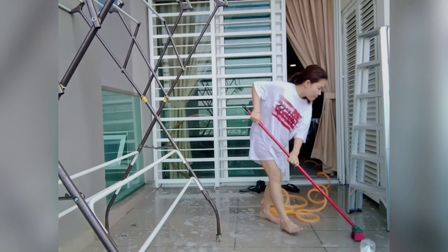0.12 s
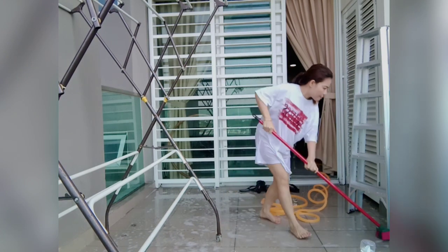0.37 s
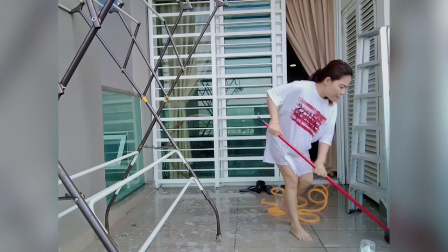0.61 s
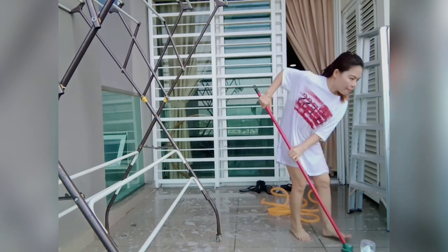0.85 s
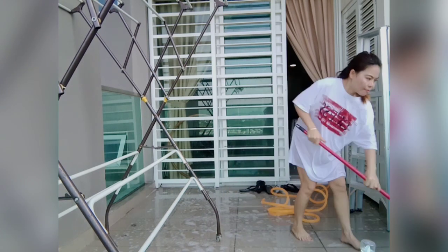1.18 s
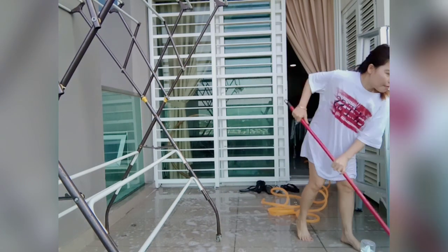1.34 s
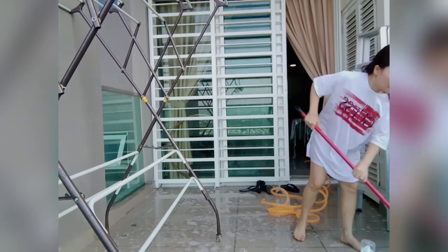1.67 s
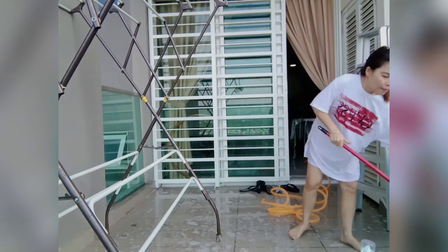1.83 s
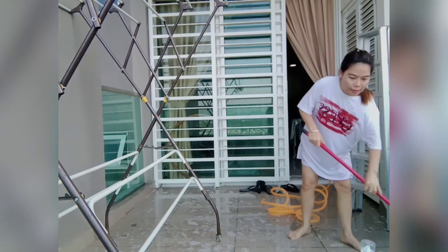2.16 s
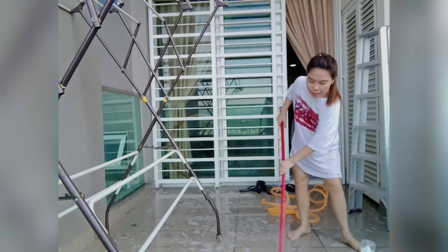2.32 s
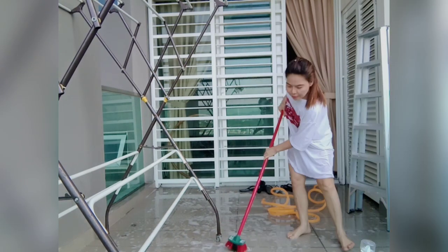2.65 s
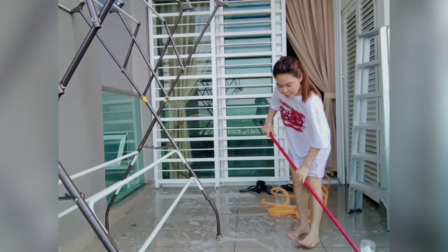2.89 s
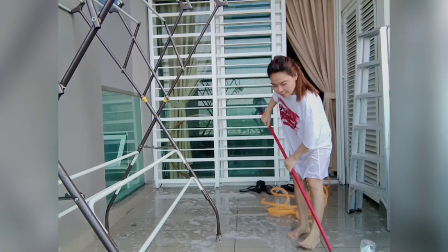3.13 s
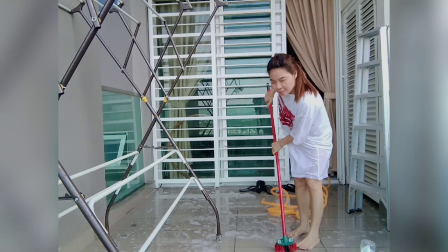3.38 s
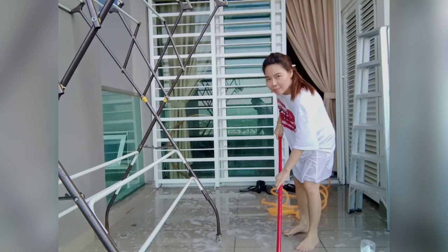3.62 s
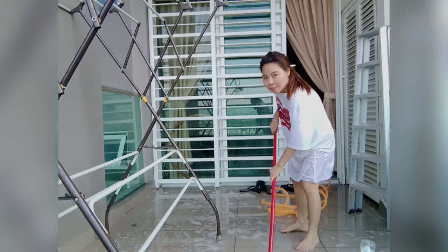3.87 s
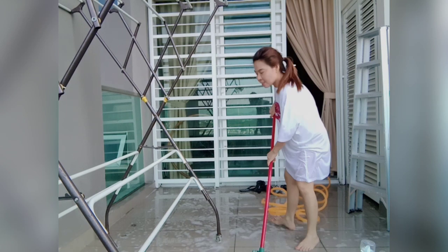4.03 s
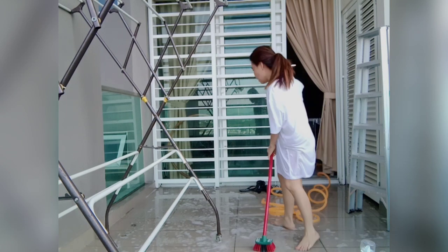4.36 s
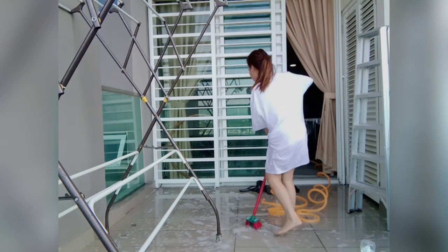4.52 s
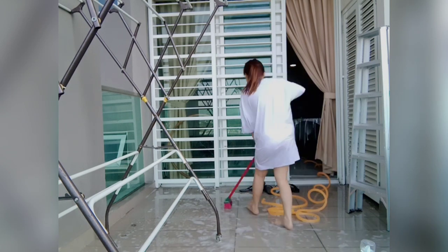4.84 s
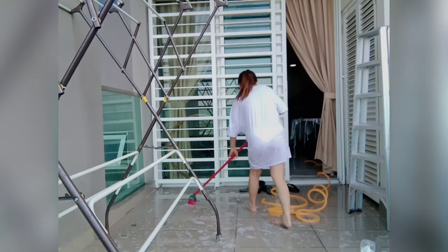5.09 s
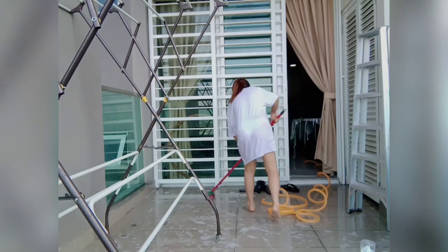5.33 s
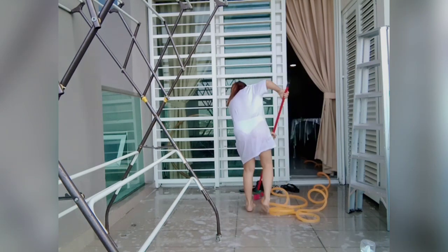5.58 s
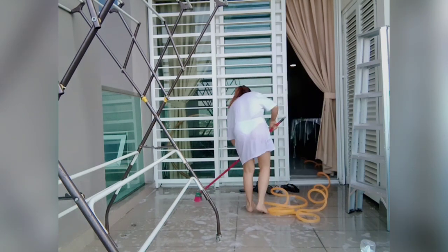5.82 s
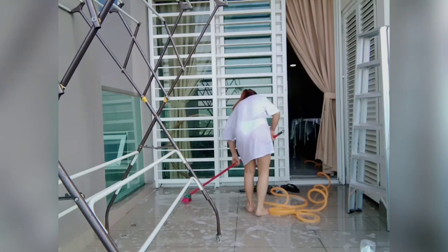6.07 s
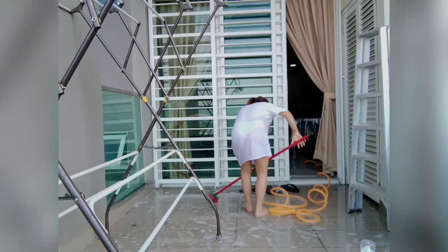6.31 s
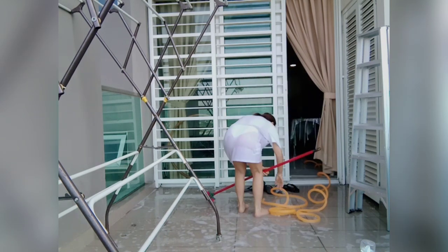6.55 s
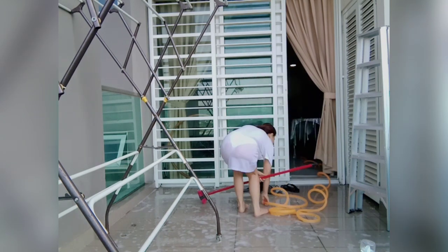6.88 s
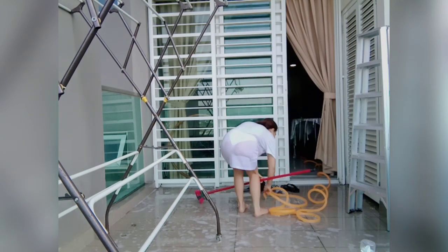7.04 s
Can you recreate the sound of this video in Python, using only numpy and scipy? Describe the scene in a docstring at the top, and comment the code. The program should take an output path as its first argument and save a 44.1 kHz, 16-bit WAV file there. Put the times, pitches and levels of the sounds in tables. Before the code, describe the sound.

Close, grainy scrubbing on wet tile: coarse bristles start each push or pull thin and bright, deepen as they bend, and throw fine spray. Quick strokes overlap for about six seconds, then weaken and stop, followed by two tiny bristle touches. Nearby hard walls add a short reflection. Underneath lie dull outdoor rumble, muffled thumps, distant noise, a far faint whine and steady high hiss; mono, fairly near microphone.

```python
"""From the start a stiff long-handled brush scrubs to and fro over wet balcony tiles; close walls answer.
Random bristle flicks make the rasp, thin as a stroke starts and deeper as they bend; finer flicks make spray.
One tiny dull pop falls at 3.7 s; after 6.5 s the brush comes to rest with two light ticks of rustle and spray.
Throughout: shaped noise as low outdoor rumble, soft thumps, dull distant noise and a steady hiss; narrow
noise bands as a far whine and faint short tones. Mono, 7.2 s."""
import sys
import numpy as np
from scipy import signal
from scipy.fft import rfft, irfft, next_fast_len
from scipy.io import wavfile
from scipy.ndimage import uniform_filter1d, map_coordinates

SR = 44100
rng = np.random.default_rng(int(sys.argv[2]) if len(sys.argv) > 2 else 0)


def wav_record(signal):
    """Record a signal, one row per channel, as 16-bit PCM in the file named by sys.argv[1]."""
    frames = np.transpose(np.atleast_2d(signal))
    bounded = np.clip(frames, -1, 1)
    # unit amplitude maps onto the largest positive 16-bit level
    quanta = np.round(bounded * 32767).astype(np.int16)
    wavfile.write(sys.argv[1], SR, quanta)


N = 317520
TIME_S = np.arange(N) / SR

# Levels are relative: later gains and normalisation apply. Spectra are per Hz of bandwidth.
# Strokes, pushes and pulls: start/s, length/s, level/dB, speed-up/s, slow-down/s, bend f at start/Hz,
# bend f fully bent/Hz, share of stroke until fully bent/1, extra body round 1.9 kHz/dB, spray re rasp/dB
STROKE_ROWS = [(-.2, .27, -22.5, .1, .1, 1500, 1060, 0.55, -2, -23),
               (0.028, .46, -22.5, 0.1, .11, 2400, 1370, 0.49, 3.5, -21),
               (0.364, 0.31, -23.5, .1, 0.14, 2530, 1050, 0.88, 3, -21),
               (0.657, 0.41, -21, 0.16, .21, 1740, 1090, 0.47, -0.5, -20),
               (0.965, 0.42, -20.5, .1, .17, 3120, 1170, 0.9, 0.5, -21),
               (1.365, .36, -21, 0.077, 0.18, 2700, 2130, .9, -1, -19.5),
               (1.691, 0.44, -21, 0.087, 0.28, 4400, 2700, 0.91, 3.5, -19),
               (2.113, .37, -21.5, 0.21, .17, 3450, 2700, 0.95, 0.5, -16.5),
               (2.328, 0.52, -20.5, 0.13, 0.28, 2300, 1100, 0.59, -0.5, -21.5),
               (2.729, 0.44, -21, 0.13, 0.17, 1950, 1380, 0.58, -1, -22),
               (3.166, 0.35, -21, .08, 0.17, 2620, 1700, 0.78, 0, -24),
               (3.441, 0.43, -20, 0.17, 0.23, 2200, 1680, 0.51, -1, -22),
               (3.858, 0.42, -20.7, 0.14, 0.3, 3940, 1400, 0.8, 1.5, -23),
               (4.287, .51, -22, 0.28, 0.2, 2630, 1320, 0.74, -0.5, -24),
               (4.6, .77, -22.5, 0.3, .18, 1200, 985, 0.41, 2.5, -20.7),
               (5.389, .41, -20.5, 0.15, .19, 2100, 1060, 0.43, 0, -23),
               (5.767, 0.42, -19.5, .12, 0.27, 2420, 1340, 0.38, -0.5, -25),
               (6.192, 0.33, -29.5, 0.15, 0.24, 3650, 2300, 1, 1.5, -19)]
# Bristles creeping on the tiles between strokes, until set down: t/s, level/dB
CREEP_LEVEL = [(0, -41), (1.7, -39), (2.1, -38), (3.9, -37), (4.3, -34.5), (5.35, -36), (6.15, -38.5),
               (6.5, -41), (6.68, -59.5)]
# Rasp spectrum, bristles fully bent: f/Hz, level/dB
RASP_SPECTRUM = [(500, -21), (780, -15), (1000, -12), (1250, -4.5), (1700, -9.5), (2800, -4.5),
                 (3400, -6.5), (4500, -2), (5200, -3), (6200, 0.5), (6600, -4.5), (7300, 4), (8300, -5.5),
                 (9600, -17.5)]
# Spray spectrum: f/Hz, level/dB
SPRAY_SPECTRUM = [(6000, -11), (8500, 4.5), (9600, 1), (11000, -4.5), (12000, -9.5), (13000, -36)]
# Light contacts of the brush head: t/s, level/dB
TICK_ROWS = [(6.553, -35), (6.789, -40)]
# Decay of the wall answer: f/Hz, t60/s
WALL_DECAY = [(200, .35), (2000, 0.41), (7000, 0.042), (12000, 0.43)]
# Outdoor rumble: t/s, level/dB
RUMBLE_LEVEL = [(0, -42), (.25, -44), (.45, -49.5), (.95, -47.5), (1.15, -57.5), (2.4, -56.5), (3.1, -51),
                (3.75, -59), (3.9, -42.5), (4.4, -47.5), (4.55, -58), (4.8, -48), (5.9, -54), (6.15, -44.5),
                (6.6, -44), (6.9, -48), (7.2, -44)]
# Rumble spectrum: f/Hz, level/dB
RUMBLE_SPECTRUM = [(25, -28), (50, -18), (75, -12), (94, -1), (112, -1.5), (140, -8), (170, -12),
                   (210, -13), (320, -27.5), (600, -52)]
# Soft low thumps in the rumble: t/s, level/dB
THUMP_ROWS = [(.05, -37.5), (.36, -44.5), (.6, -41), (1.0, -37), (1.28, -47), (1.68, -50), (2.03, -43.5),
              (2.74, -46), (3.49, -45.5), (4.71, -45), (4.89, -39), (5.15, -48), (5.34, -52), (5.47, -44.5),
              (5.63, -42.5), (5.79, -39)]
# Dull distant noise: t/s, level/dB
DISTANT_LEVEL = [(0, -55.5), (1.1, -58), (2.4, -60), (2.75, -59), (4.5, -59), (5.95, -59), (6.1, -52),
                 (6.4, -53.5), (6.7, -60), (7.2, -56.5)]
# Distant noise spectrum: f/Hz, level/dB
DISTANT_SPECTRUM = [(150, -4.5), (300, -2), (500, -5), (700, -6.5), (1000, -4), (1800, -5.5), (3000, -33),
                    (6000, -48)]
# Far whine: t/s, level/dB, f/Hz
WHINE_TRACK = [(0, -52.5, 1225), (2.3, -52.5, 1245), (4.2, -47, 1260), (5.9, -47.5, 1240),
               (6.11, -38.5, 1252), (6.25, -53.5, 1234), (6.58, -55, 1238), (6.66, -50.5, 1235),
               (6.8, -47.5, 1207), (6.96, -43.5, 1290), (7.12, -44.5, 1278), (7.2, -49, 1275)]
# Faint passing tones, low hums to thin squeaks: t/s, length/s, f start/Hz, f end/Hz, width/Hz, level/dB
TONE_ROWS = [(-.08, 0.17, 339, 346, 23, -46.5), (4.851, 0.66, 86, 81.9, 5, -50.5),
             (5.945, 0.43, 96.8, 95.5, 5.6, -38.5), (6.017, 0.29, 411, 401, 22, -49.5),
             (6.03, 0.11, 690, 654, 25, -50.5), (6.026, .1, 740, 760, 28, -58),
             (6.42, 0.11, 3100, 2490, 260, -52), (6.436, 0.24, 98, 93.4, 1.8, -40),
             (6.72, .13, 3000, 3690, 530, -56), (6.89, .1, 670, 737, 68, -51)]
# Quiet steady hiss spectrum, with peaks near 6 and 7.4 kHz: f/Hz, level/dB
HISS_SPECTRUM = [(2200, -11.5), (3400, -17), (3900, -16), (5200, -24), (6000, -2), (6350, -7), (6650, -18),
                 (7000, 0), (7450, 4), (8000, -5), (9000, -9.5), (10000, -18), (12500, -32)]

RECOVER_OCTAVES_PER_S = 1.9  # bristles straighten as the brush slows
SPLASH_DB, SPLASH_S = 13, 0.24  # spray boost as a stroke meets fresh water; its 1/e time in dB
THUMP_S = 0.036  # from thump peak to 1/e
TOP_HZ = 13250


def amp(db):
    """Decibels to gain."""
    return 10 ** (np.asarray(db) / 20)


def unit(x):
    """Scale to rms 1."""
    return x / np.sqrt(np.mean(x ** 2) + 1e-20)


def along(points, hz):
    """Interpolate (f/Hz, value) points on a log frequency axis."""
    f_hz, value = np.transpose(points)
    return np.interp(np.log(hz + 1), np.log(f_hz), value)


def curves(rows):
    """Interpolate each column after the time to one value per sample."""
    knot_s, *columns = np.transpose(rows)
    return [np.interp(TIME_S, knot_s, column) for column in columns]


def noise():
    """White Gaussian noise."""
    return rng.standard_normal(N)


def wobble(knots_per_s):
    """Smooth random curve: a spline through Gaussian knots."""
    knots = rng.standard_normal(int(N * knots_per_s / SR) + 4)
    return map_coordinates(knots, [np.arange(N) * knots_per_s / SR])


def filtered(x, response):
    """Apply a zero-phase gain given as a function of frequency."""
    size = next_fast_len(N + SR // 2)
    hz = np.fft.rfftfreq(size, 1 / SR)
    return irfft(rfft(x, size) * response(hz), size)[:N]


def coloured(x, spectrum):
    """Shape x by a spectrum, falling away beyond its ends; rms 1."""
    low_hz, high_hz = spectrum[0][0], spectrum[-1][0]

    def response(hz):
        ends = np.minimum(hz / low_hz, 1) ** 2 / np.maximum(hz / high_hz, 1) ** 10
        return amp(along(spectrum, hz)) * ends

    return unit(filtered(x, response))


def flicks(per_s, spread_db):
    """Impulses at random moments with random sign and size; rms 1."""
    hit = rng.random(N) < per_s / SR
    sign = np.sign(noise())
    return unit(hit * sign * amp(spread_db * noise()))


def narrow(pitch_hz, width_hz):
    """Fuzzy tone: a noise band, width_hz wide at -6 dB, round a moving pitch; rms 1."""
    skirt = lambda hz: 1 / (1 + (2 * hz / width_hz) ** 2)
    in_phase, quadrature = [filtered(noise(), skirt) for _ in range(2)]
    phase = 2 * np.pi * np.cumsum(pitch_hz) / SR
    return unit(in_phase * np.cos(phase) + quadrature * np.sin(phase))


def patchy(z, depth_db):
    """Random gains on time-frequency cells, alike over about 300 Hz and 40 ms."""
    field = rng.standard_normal(z.shape)
    for _ in range(2):
        field = uniform_filter1d(field, size=3, axis=0)
        field = uniform_filter1d(field, size=11, axis=1)
    return z * amp(depth_db * unit(field))


def brush():
    """Strokes drive both the bristle rasp and the high, unsteady spray of the water film."""
    rasp_gain, spray_gain, bend_hz, body_db = strokes()
    creep_db, = curves(CREEP_LEVEL)
    grip = amp(0.18 * wobble(22))
    rasp = np.hypot(grip * rasp_gain, amp(creep_db)) * bristles(bend_hz, body_db)
    return amp(0.69) * rasp + spray_gain * water_film()


def strokes():
    """Each stroke speeds up, bends the bristles, slows: rasp gain, spray gain, bend f/Hz, body/dB."""
    power, spray_power, weight, octaves, body = np.zeros((5, N))
    ease = lambda u: np.sin(np.pi / 2 * np.clip(u, 0, 1))
    for (start_s, length_s, db, rise_s, fall_s,
         start_hz, bent_hz, bent_share, body_db, spray_db) in STROKE_ROWS:
        near = np.abs(TIME_S - start_s - length_s / 2) < length_s
        age_s = TIME_S[near] - start_s
        speed = ease(age_s / rise_s) * ease((length_s - age_s) / fall_s)
        push = (amp(db) * speed) ** 2
        age_s = np.clip(age_s, 0, length_s)
        bent_s = bent_share * length_s
        bending = np.log2(bent_hz / start_hz) * np.minimum(age_s / bent_s, 1)
        recovering = RECOVER_OCTAVES_PER_S * np.maximum(age_s - bent_s, 0)
        splash_db = SPLASH_DB * np.exp(-age_s / SPLASH_S)
        power[near] += push
        spray_power[near] += push * amp(spray_db + splash_db) ** 2
        # where strokes meet, their colours blend, the stronger weighing more
        say = push + 1e-9
        weight[near] += say
        octaves[near] += say * (np.log2(start_hz) + bending + recovering)
        body[near] += say * body_db
    active = weight > 0
    blend = lambda v: np.interp(TIME_S, TIME_S[active], v[active] / weight[active])
    return np.sqrt(power), np.sqrt(spray_power), 2 ** blend(octaves), blend(body)


def bristles(bend_hz, body_db):
    """Tips catch and flick in tufts; little sounds below their lowest ringing pitch."""
    tufts = amp(0.47 * wobble(60) + 0.43 * wobble(300))
    rasp = coloured(flicks(per_s=13000, spread_db=2) * tufts, RASP_SPECTRUM)
    hz, frame_s, z = signal.stft(rasp, SR, nperseg=512, noverlap=384)
    f_hz = hz[:, None] + 1
    bend_hz, body_db = [np.interp(frame_s, TIME_S, control) for control in (bend_hz, body_db)]
    above = f_hz / bend_hz
    # ever fewer bristles ring below the bend pitch; steep cut below that of the longest
    steepness, lowest_ratio, longest_hz, leak_db = 3.0, 0.73, 1350, -20
    edge_hz = np.minimum(lowest_ratio * bend_hz, longest_hz)
    share = 1 / (1 + above ** (-2 * steepness)) / (1 + (edge_hz / f_hz) ** 20)
    passed = np.sqrt(share + amp(leak_db) ** 2)
    # a narrow peak at the bend pitch, a broad one at 1.9 kHz; widths in log frequency
    ring = amp(2 * np.exp(-(np.log(above) / 0.063) ** 2))
    body = amp(body_db * np.exp(-(np.log(f_hz / 1900) / 0.57) ** 2))
    # single tufts stand out at the low end, where few ring at once
    patch_db = along([(2500, 2.0), (6000, 0.8)], hz)[:, None]
    z = patchy(z, patch_db) * passed * ring * body
    return signal.istft(z, SR, nperseg=512, noverlap=384)[1][:N]


def water_film():
    """Sparse equal-sized impulses, coloured high and unsteady in level, as spray."""
    droplets = flicks(per_s=2000, spread_db=0.0)
    return amp(0.62 * wobble(40)) * coloured(droplets, SPRAY_SPECTRUM)


def ticks(t60_s=0.21, spray_db=-8):
    """The brush head touches down: each time a decaying rustle of bristles and a little spray."""
    touch = np.zeros(N)
    for start_s, db in TICK_ROWS:
        decay_db = -60 * np.abs(TIME_S - start_s) / t60_s
        touch += amp(db - 5 + decay_db) * (TIME_S >= start_s)
    rustle = coloured(flicks(per_s=6000, spread_db=2), RASP_SPECTRUM)
    droplets = coloured(flicks(per_s=4000, spread_db=2), SPRAY_SPECTRUM)
    return touch * (rustle + amp(spray_db) * droplets)


def pop(at_s=3.714, width_s=0.00036, gain_db=-27):
    """One tiny dull pop in mid-stroke: a Gaussian-derivative pulse."""
    u = (TIME_S - at_s) / width_s
    return amp(gain_db) * u * np.exp(-u * u)


def balcony(x, wet_db):
    """Direct sound plus short decaying noise tails off close walls, crossfaded to a new tail every 0.1 s."""
    hop = SR // 10
    seeds = rng.standard_normal((N // hop + 2, SR // 3))
    hz, age_s, z = signal.stft(seeds, SR, nperseg=256)
    decay = amp(-60 * age_s / along(WALL_DECAY, hz)[:, None])
    tails = signal.istft(z * decay, SR, nperseg=256)[1]
    tails /= np.linalg.norm(tails, axis=1, keepdims=True)
    padded, wet = np.pad(x, (hop, SR)), np.zeros(N + 2 * SR)
    window = np.sqrt(np.hanning(2 * hop))
    for k, tail in enumerate(tails):
        piece = padded[k * hop:][:2 * hop] * window
        answer = signal.fftconvolve(piece, tail)
        wet[k * hop:][:len(answer)] += answer
    return x + amp(wet_db) * wet[hop:hop + N]


def rumble():
    """Low shaped noise, unsteady in level, with Gaussian swells as soft thumps."""
    level_db, = curves(RUMBLE_LEVEL)
    thumps = sum(amp(db) * np.exp(-((TIME_S - peak_s) / THUMP_S) ** 2) for peak_s, db in THUMP_ROWS)
    gain = np.hypot(amp(level_db + 2.1 * wobble(9.5)), thumps)
    return gain * coloured(noise(), RUMBLE_SPECTRUM)


def distant_noise():
    """Dull shaped noise, unsteady in level."""
    level_db, = curves(DISTANT_LEVEL)
    return amp(level_db + 4.0 + 1.6 * wobble(17)) * coloured(noise(), DISTANT_SPECTRUM)


def whine():
    """Far whine: a narrow noise band of drifting pitch and level."""
    level_db, pitch_hz = curves(WHINE_TRACK)
    return amp(level_db) * narrow(pitch_hz, width_hz=122)


def tones():
    """Faint short gliding noise bands swell and fade on a half sine."""
    out = np.zeros(N)
    for start_s, length_s, start_hz, end_hz, width_hz, db in TONE_ROWS:
        u = np.clip((TIME_S - start_s) / length_s, 0, 1)
        pitch_hz = start_hz + u * (end_hz - start_hz)
        out += amp(db) * np.sin(np.pi * u) * narrow(pitch_hz, width_hz)
    return out


def hiss(level_db=-54.0, patch_db=2):
    """Faint high noise of steady mean level, finely patchy over time and frequency."""
    z = signal.stft(noise(), nperseg=512, noverlap=384)[2]
    uneven = signal.istft(patchy(z, patch_db), nperseg=512, noverlap=384)[1][:N]
    return amp(level_db) * coloured(uneven, HISS_SPECTRUM)


def scene():
    """Brush in the balcony plus the background, the same in both channels."""
    scrubbing = balcony(brush() + ticks(), wet_db=-9)
    background = rumble() + distant_noise() + whine() + tones() + hiss()
    mono = amp(-0.31) * scrubbing + pop() + background
    return np.array([mono, mono])


def record(dry):
    """Band limit: keep only what lies below TOP_HZ."""
    return np.array([filtered(channel, lambda hz: hz < TOP_HZ) for channel in dry])


dry = scene()
out = record(dry)
wav_record(out)
```